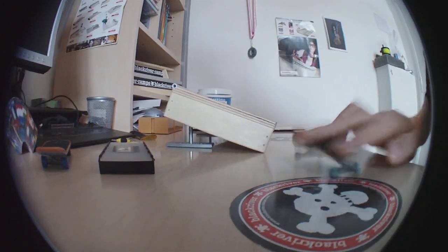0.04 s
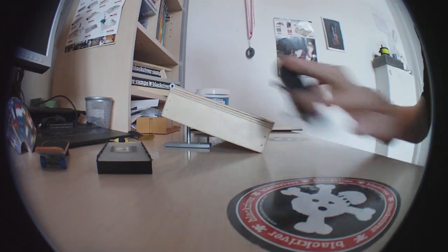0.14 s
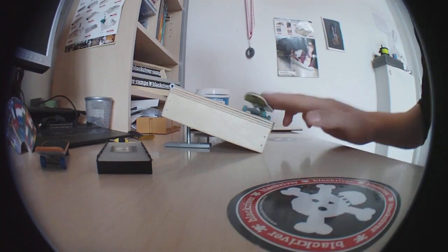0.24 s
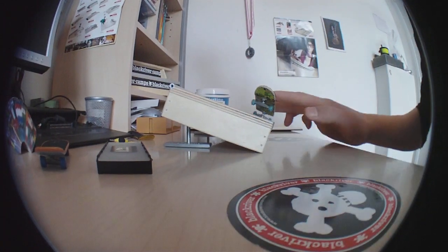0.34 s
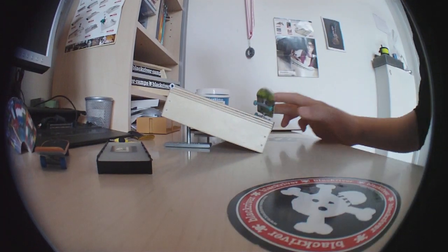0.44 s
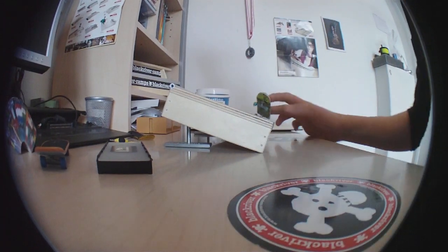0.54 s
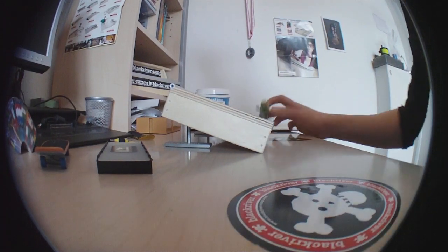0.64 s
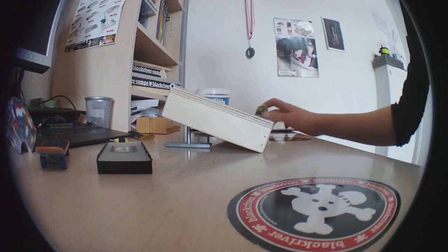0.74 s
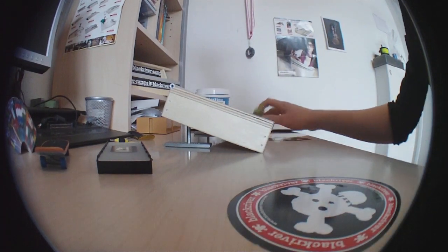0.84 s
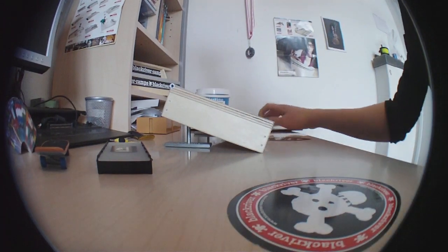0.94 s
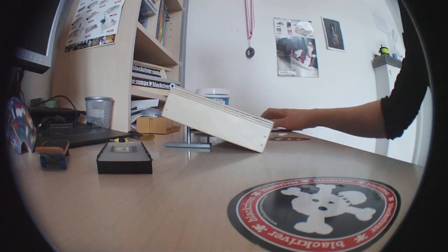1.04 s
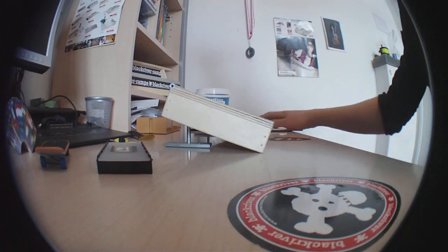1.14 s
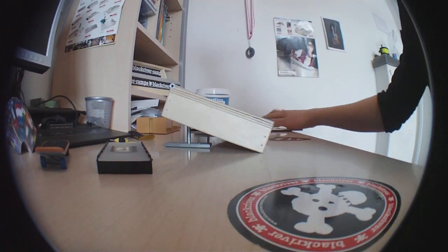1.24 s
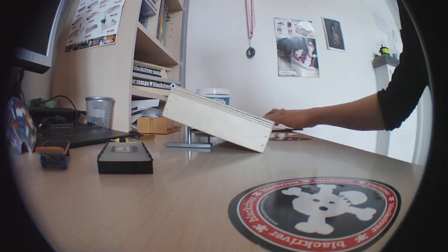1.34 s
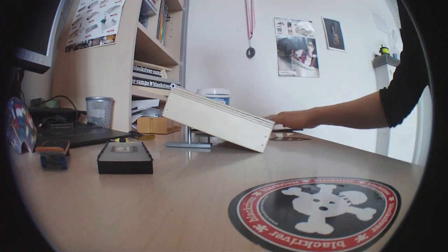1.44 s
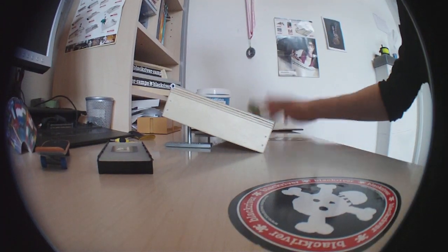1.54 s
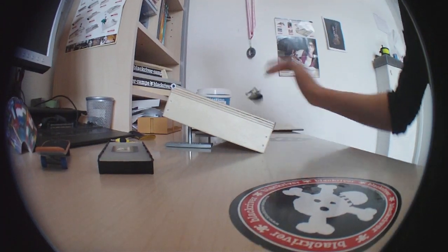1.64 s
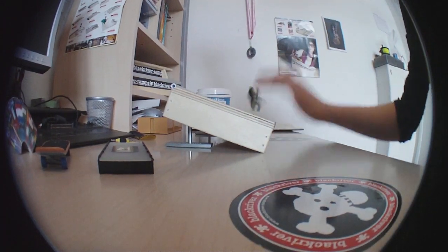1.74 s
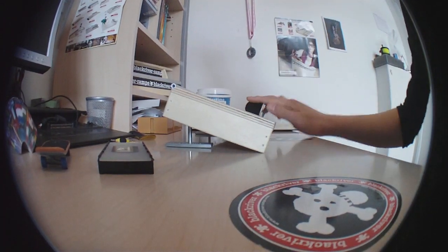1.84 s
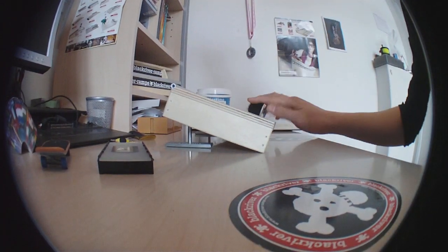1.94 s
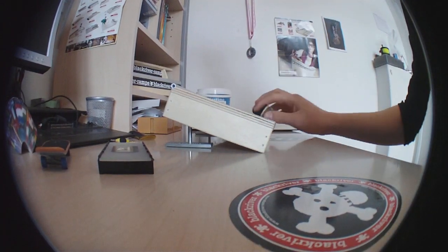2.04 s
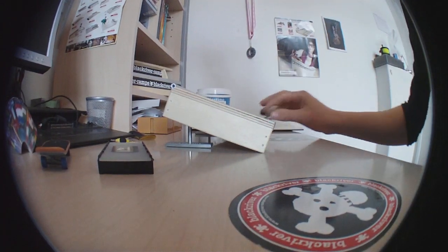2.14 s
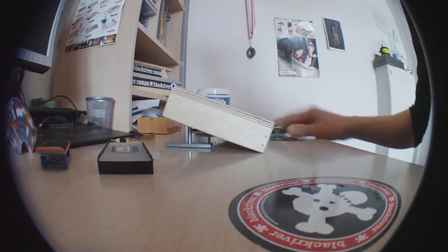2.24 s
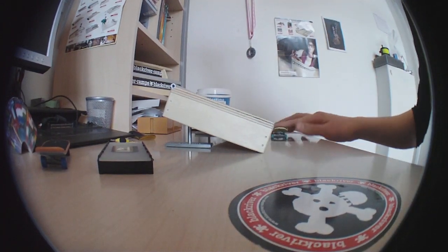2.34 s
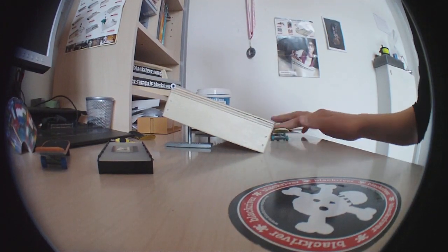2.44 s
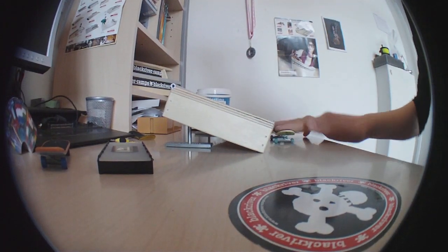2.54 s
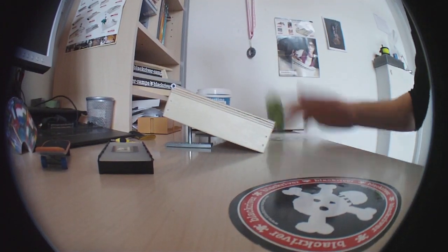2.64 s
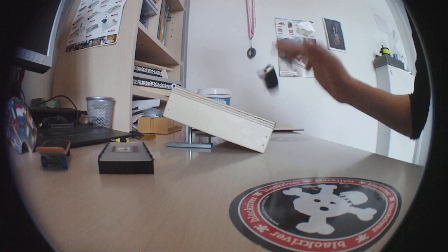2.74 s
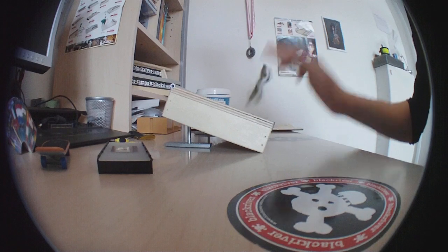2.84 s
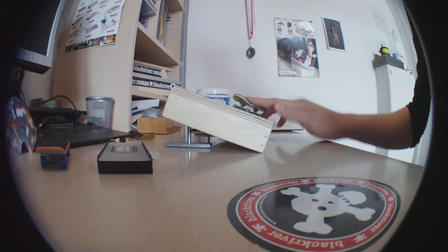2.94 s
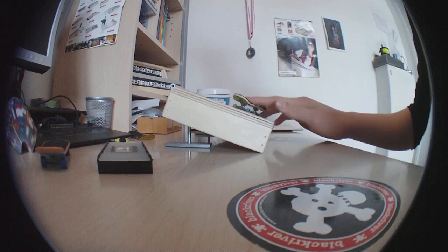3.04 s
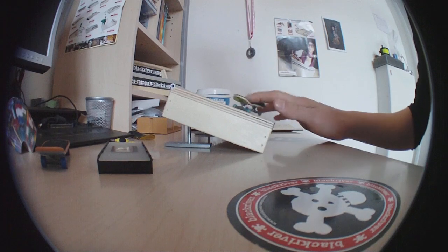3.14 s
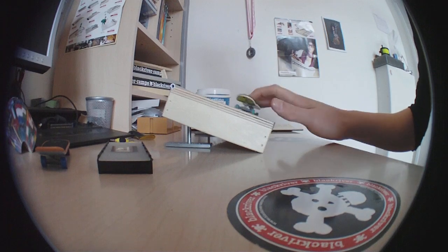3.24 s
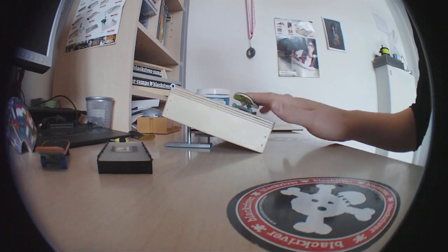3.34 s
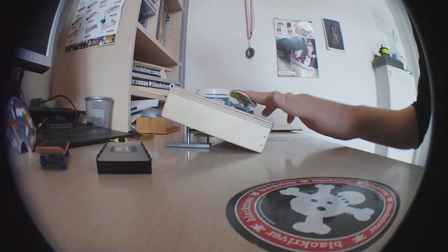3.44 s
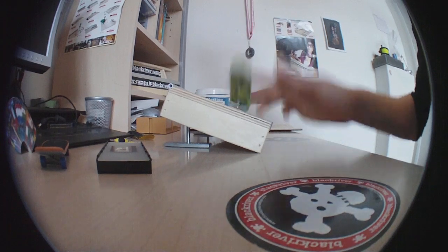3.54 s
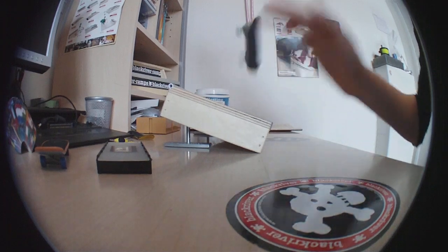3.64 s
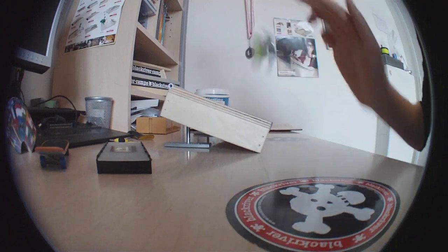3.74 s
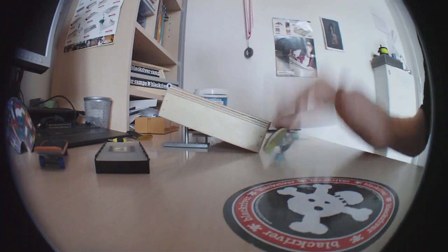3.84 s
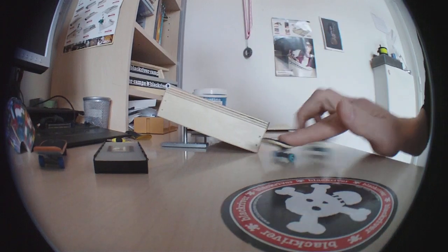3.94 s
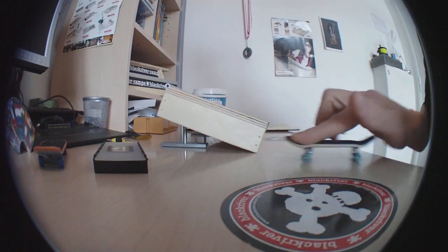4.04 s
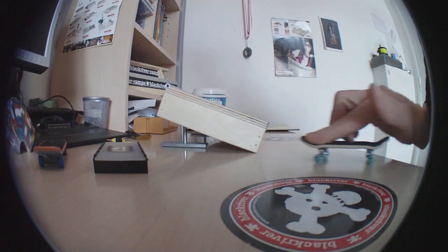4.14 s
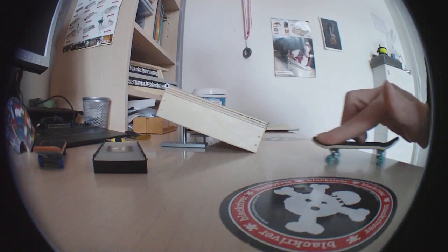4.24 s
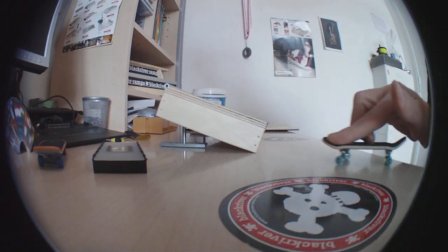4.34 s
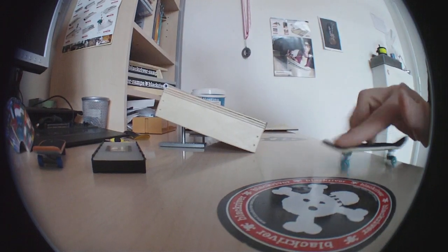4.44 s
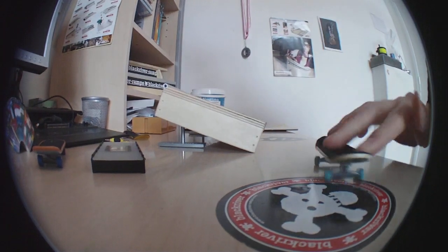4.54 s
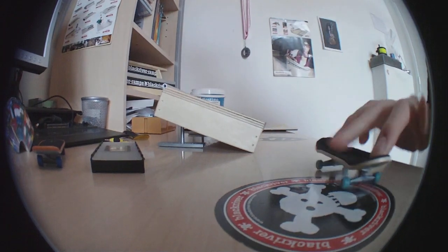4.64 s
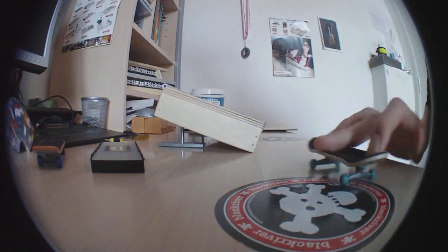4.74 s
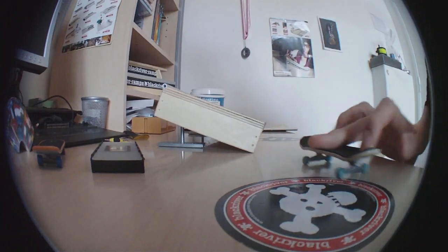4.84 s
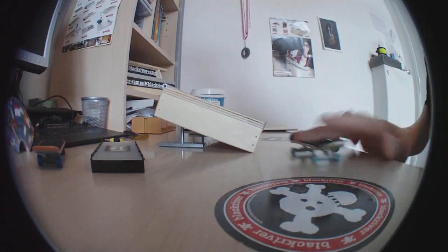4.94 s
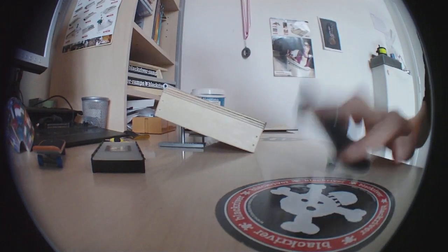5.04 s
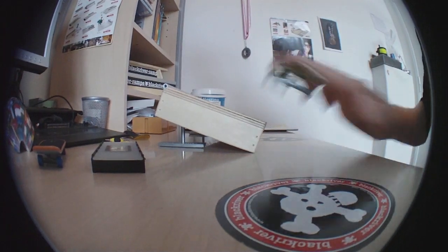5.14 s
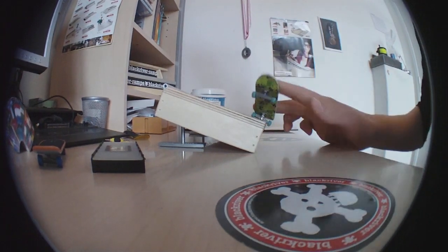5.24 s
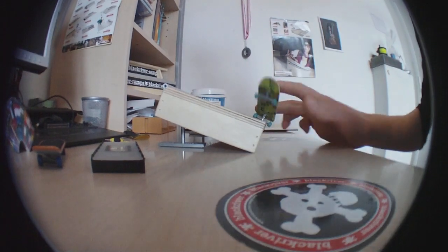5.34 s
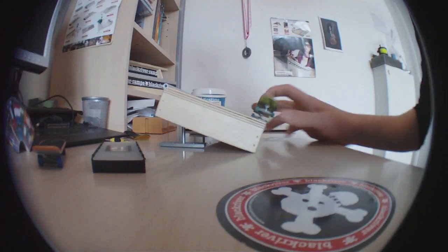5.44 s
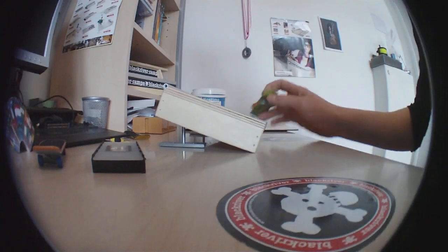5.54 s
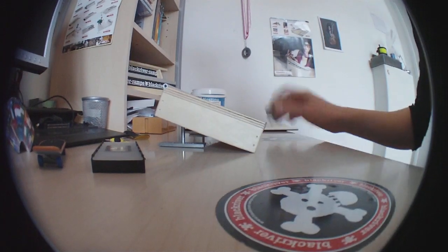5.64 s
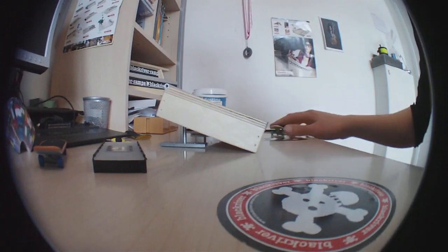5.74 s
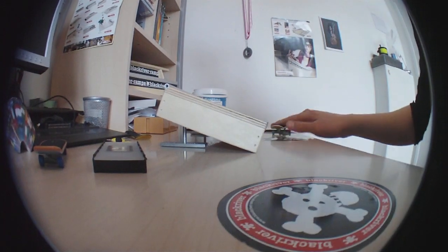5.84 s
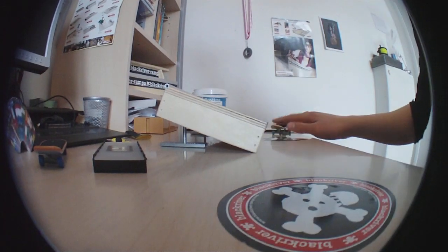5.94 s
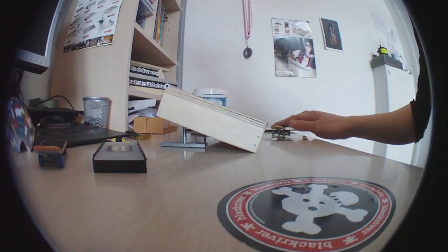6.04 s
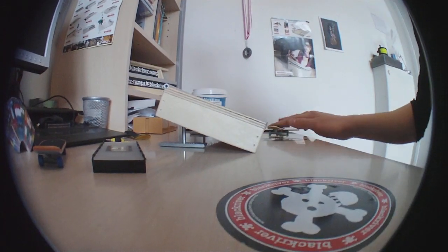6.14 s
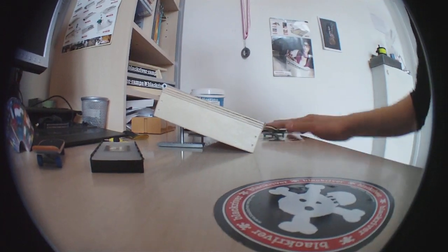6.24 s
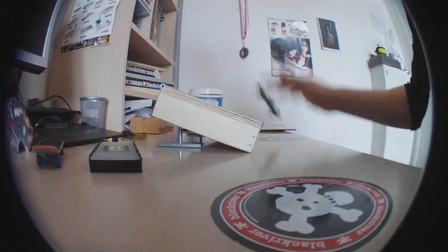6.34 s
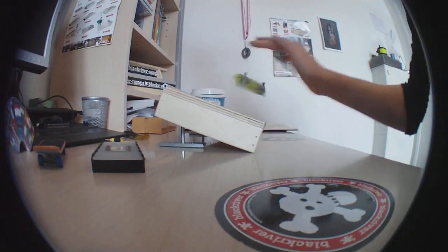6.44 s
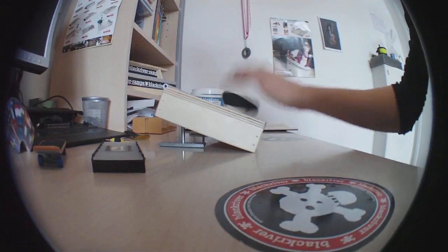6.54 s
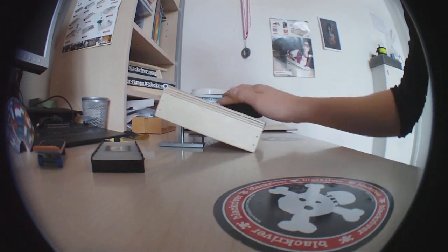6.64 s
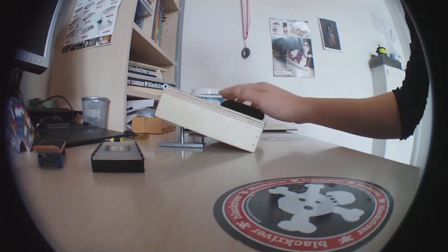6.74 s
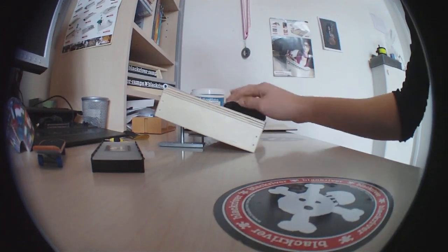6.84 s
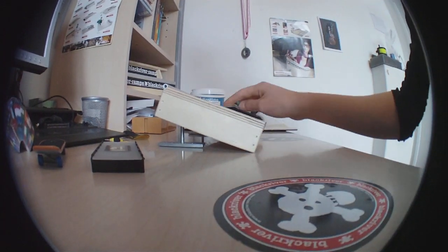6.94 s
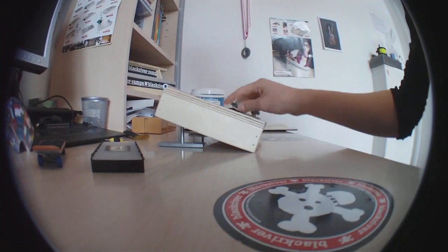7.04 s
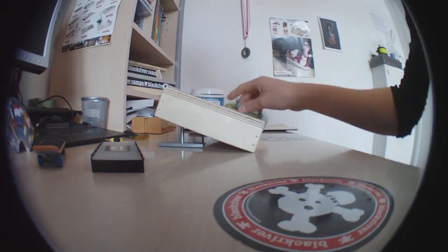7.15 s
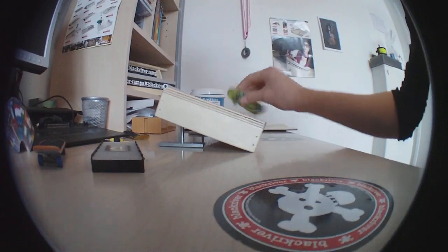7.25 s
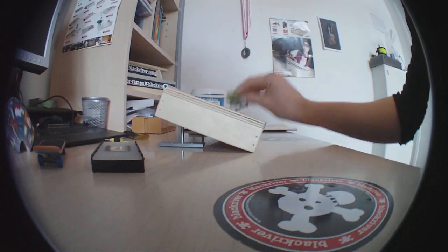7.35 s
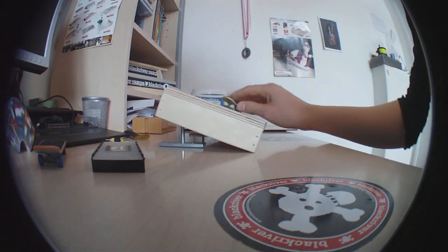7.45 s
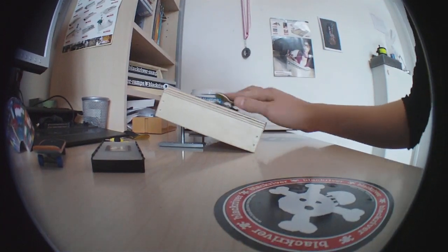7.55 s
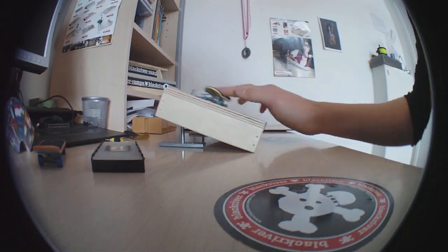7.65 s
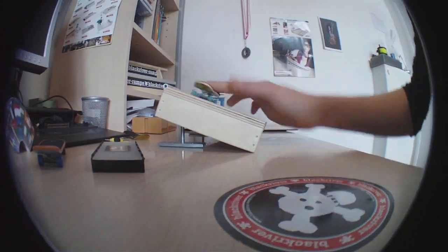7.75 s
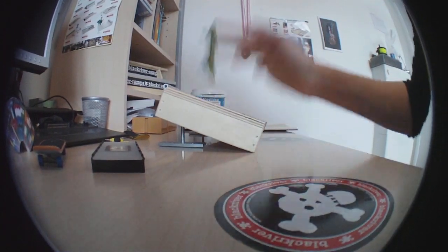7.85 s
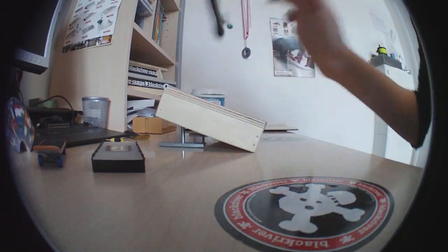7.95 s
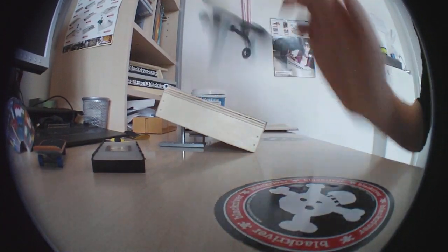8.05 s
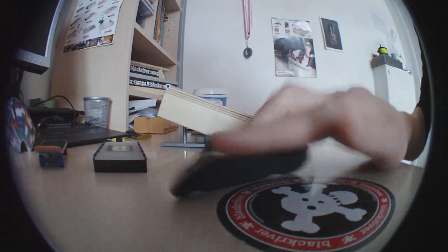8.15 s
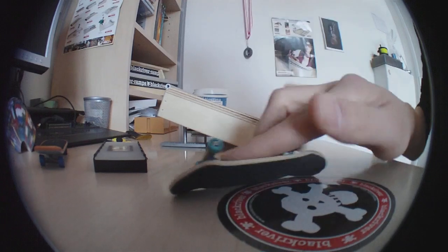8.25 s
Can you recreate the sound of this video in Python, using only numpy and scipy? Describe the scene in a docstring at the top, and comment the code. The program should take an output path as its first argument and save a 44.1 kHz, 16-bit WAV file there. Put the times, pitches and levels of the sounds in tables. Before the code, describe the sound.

Close stereo sound in a small quiet room with a faint high whine. A tiny skateboard rolls in a short rough burst, its tail snaps at 0.2 s and it clacks on the hollow ramp at 0.3, then grinds along it, dropping to the desk near 0.8. Faint taps and finger rubs follow until a light snap at 1.6 and strong woody clacks with a metallic ping at 1.8-1.9. Desk clacks at 2.3, a roll, a loud pop at 2.7, a ramp rattle around 3.0, a slide and a loud pop at 3.65. A desk clatter at 3.9-4.0 leads into uneven rolling, with a pop at 5.15, ramp hit at 5.3, scraping slide and desk click at 5.8. After soft rolls, a pop at 6.4 and ramp clatter at 6.65. Near quiet, then ramp taps at 7.45, a slide, a pop at 7.9 and a hard desk double clack at 8.2.

```python
"""Fingerboard on a desk

A tiny skateboard is ridden by hand in a small room: its tail pops, and its wheels and deck clack onto a desk
and a hollow wooden ramp. A blow is filtered noise for the click, knock and room, plus fading tones for wood.
Rolling and sliding are noise that swells with each push. Fingers rub softly, and under it all lie
quiet room noise and a camera's thin whine."""
import sys
import numpy as np
from scipy import signal
from scipy.fft import rfft, irfft, next_fast_len
from scipy.io import wavfile
from scipy.ndimage import uniform_filter1d, map_coordinates

SR = 44100
rng = np.random.default_rng(int(sys.argv[2]) if len(sys.argv) > 2 else 0)


def waveform_to_disk(signal):
    """Save audio, clipped to [-1, 1], as 16-bit WAV at the path in sys.argv[1]."""
    frames = np.transpose(np.atleast_2d(signal))
    scaled = np.clip(frames, -1, 1) * 32767
    samples = np.round(scaled).astype(np.int16)
    wavfile.write(sys.argv[1], SR, samples)


N = 365588  # length in samples

# All table levels are relative: each sound also gets its own trim in the functions below.
# Ringing tones of the desk top, of its panels and of the whole desk: [f/Hz, level/dB]
DESK_MODES = [(502,-10),(556,-7),(739,-6.5),(905,-15.5),(1077,-4.5),(1630,-7.5)]
PANEL_MODES = [(157,1.5),(205,-12.5),(245,-10.5),(288,1),(330,-2)]
THUD_MODES = [(30,1.5),(44,-2.5),(78,2),(100,2.5)]
# Ringing tones of the ramp's wood and of its hard edge: [f/Hz, level/dB]
RAMP_MODES = [(466, -8), (502, -3.5), (550, 0.5), (591, 0), (670, 2), (904, -1), (990, -6.5), (1080, 0),
              (1400, -5)]
EDGE_MODES = [(2590, -4), (2630, -1), (3286, -8), (3440, 0), (3661, -2.5)]

# Noise colours of a blow: board click, desk knock, ramp knock, desk panels: [f/Hz, level/dB]
CLICK_COLOUR = [(900,-37.5),(2200,-16.5),(3200,-12),(4300,-3.5),(5700,-8),(6500,-3),(7100,1.5),(7800,-4),(8700,-3.5),(10000,-11),(12000,-17),(15000,-21.5)]
DESK_KNOCK_COLOUR = [(200,-50),(400,-13.5),(540,-5.5),(800,-3.5),(1080,1),(1350,-2),(1650,-1),(2100,-8),(3000,-7.5),(6000,-19)]
RAMP_KNOCK_COLOUR = [(200,-36.5),(400,-14),(540,-1.5),(750,-4),(1000,3),(1400,-4.5),(2000,-9),(3400,-12),(7000,-29)]
PANEL_COLOUR = [(50,-21.5),(150,-3),(210,-10),(310,-2),(420,-10),(800,-34)]
# Noise colours of riding: rumble of desk and ramp, hiss of the scraping board: [f/Hz, level/dB]
DESK_RUMBLE_COLOUR = [(60,-21.5),(210,-28.5),(330,-9),(420,-16),(560,-10.5),(820,-7),(1070,2),(1270,-6.5),(1620,-11),(2100,-25),(3400,-28),(7000,-63.5)]
RAMP_RUMBLE_COLOUR = [(60,-17.5),(200,-27.5),(310,-10),(390,-15),(540,4),(660,0.5),(770,-5.5),(940,-1),(1400,-6.5),(1900,-18),(7000,-47)]
HISS_COLOUR = [(900,-27.5),(1450,2),(2200,-6),(3200,-4),(4200,-3.5),(5500,-12),(6500,-5.5),(7100,-3),(7800,-10.5),(8700,-8),(10000,-16.5),(15000,-34)]
# Noise colours of the wheels: their own resonance, and the whirr that joins in at speed: [f/Hz, level/dB]
WHEEL_RING_COLOUR = [(700, -41), (960, -6), (1080, -0.5), (1200, -11.5), (1500, -48.5)]
WHEEL_WHIRR_COLOUR = [(900, -30), (1300, -5), (1620, 0), (2000, -16.5), (2400, -5.5), (3200, -32)]
# Noise colours of fingers on grip tape and of the quiet room: [f/Hz, level/dB]
GRIP_COLOUR = [(2500, -36), (3400, -19), (4000, -7.5), (5300, -22), (6400, -4.5), (7050, -4.5), (7700, -14),
               (8700, -11.5), (10500, -28), (15000, -31)]
ROOM_COLOUR = [(25, -6), (170, -2), (400, -10.5), (1100, -18.5), (1800, -22), (5500, -23.5), (6900, -17),
               (9000, -23.5), (11000, -31), (15000, -39.5)]

# Stereo width, as a gain on the side signal: [f/Hz, level/dB]
WIDTH = [(60,-11.5),(500,-17.5),(1200,-15),(2400,-10.5),(4400,-2),(7500,4),(15000,-8.5)]
# Stereo balance, left minus right: [f/Hz, level/dB]
TILT = [(100,-0.5),(1200,1.3),(2400,-1),(4400,-2.5),(7000,-11),(9000,7.5),(15000,-3)]
# The camera's upper band limit: [f/Hz, level/dB]
BAND_LIMIT = [(15100,0),(15500,-14),(16400,-45),(16600,-120)]

# The tail snaps down to pop the board up, or just taps: [t/s, strength level/dB]
TAIL_POPS = [(0.1847, -12), (1.068, -26), (1.642, -26), (2.7369, -6.5), (3.6492, -6.5), (5.1467, -9.5),
             (6.4037, -6), (7.0575, -34.5), (7.89, -7.5)]
# Wheels and deck come down on the desk, then on the ramp:
# [t/s, force level/dB, hardness (click over knock) level/dB, weight of the hand behind it level/dB]
DESK_LANDINGS = [(0.7772, -25, 14.5, -35), (2.3206, -22, 16, -28.5), (2.3465, -15, 8.5, -38),
                 (3.9203, -14.5, 11, -17), (3.9504, -10.5, 5.5, -24.5), (3.9848, -9.5, 6.5, -26),
                 (4.5555, -26.5, -2.5, -58), (4.6278, -30, 7.5, -43), (5.0761, -26.5, 9, -27.5),
                 (5.779, -17, 15, -30.5), (8.1998, -10, 3, -18), (8.2086, -8.5, 9.5, -17.5)]
RAMP_LANDINGS = [(0.3056, -10.5, 9, -17), (0.3134, -23, 21, -41), (1.8036, -12.5, 2.5, -24),
                 (1.8718, -9.5, -3, -19), (1.8827, -8.5, 4.5, -25.5), (2.9646, -15, 2.5, -21.5),
                 (2.9816, -18.5, 6.5, -25), (3.008, -17.5, 10, -29), (3.0303, -19, 7, -25),
                 (3.2644, -23, 8, -30.5), (5.2922, -13.5, 14, -19), (6.626, -21.5, 17, -27.5),
                 (6.6598, -16, 11.5, -22.5), (6.6772, -12.5, -5, -23.5), (7.2483, -41, 8, -47.5),
                 (7.2877, -43.5, 15, -65), (7.4542, -28.5, 16, -40), (7.4595, -20.5, -1, -32.5),
                 (7.4904, -18, 9, -33.5)]
# A metal truck catches the ramp's edge as the board lands: [t/s, level/dB]
EDGE_STRIKES = [(0.3056, -27.5), (1.8036, -28.5), (1.8827, -13.5), (5.2922, -26), (6.626, -28.5),
                (6.6772, -18.5), (7.4595, -31)]
# Pushes over the desk, then slides and rolls along the ramp:
# [fastest moment t/s, rumble level/dB, speed-up t/s, slow-down t/s, scrape (hiss over rumble) level/dB]
DESK_PUSHES = [(0.05, -22, 0.21, 0.17, -2), (0.135, -26, 0.059, 0.09, -1), (0.935, -41.5, 0.19, 0.086, -12),
               (1.11, -54, 0.3, 0.21, -14), (1.364, -48.5, 0.09, 0.085, -18), (1.55, -51, 0.075, 0.14, -15),
               (2.09, -34, 0.17, 0.22, -9.5), (2.605, -29, 0.22, 0.16, -4.5),
               (2.7, -29.5, 0.061, 0.074, -1), (4.19, -35, 0.41, 0.22, -8.5), (4.29, -37, 0.35, 0.66, -35),
               (4.575, -25.5, 0.085, 0.2, 0.5), (4.88, -36, 0.16, 0.1, -11), (5.025, -26, 0.18, 0.22, -7),
               (5.945, -42, 0.16, 0.12, -6), (6.065, -36, 0.047, .12, -10.5), (6.185, -40, 0.072, .08, -27),
               (6.285, -27.5, 0.081, 0.12, -7), (6.365, -24, 0.051, 0.076, -7)]
RAMP_PUSHES = [(0.6, -23.5, 0.14, .28, -6.5), (0.71, -35.5, 0.54, 0.17, 7), (3.395, -42, 0.24, 0.069, -27),
               (3.565, -30, 0.2, 0.3, -19.5), (5.49, -31.5, 0.19, 0.45, -14.5),
               (5.595, -29, 0.26, 0.14, -3.5), (7.62, -32, 0.068, 0.3, -34.5),
               (7.735, -28.5, 0.19, .34, -9.5)]
# Fingers press and rub the board's grip tape: [t/s, press level/dB, rub level/dB]
FINGER_TOUCHES = [(0.965, -68, -48), (1.06, -59, -47), (1.135, -50, -56), (1.225, -67, -52),
                  (1.363, -44, -54), (1.54, -50, -57), (1.655, -38.5, -43), (6.94, -60.5, -53.5),
                  (7.07, -55, -49.5), (7.21, -48.5, -63)]

RING_T60_S = 0.23  # time for a ringing tone to fall by 60 dB
DIRECT_DB = 9  # the first crack of a blow, over the scatter that follows it
POP_KNOCK_DB, POP_BODY_DB, POP_THUD_DB = -20, -22.5, -32  # relative to a pop's click, before trims
THUD_GROWTH = 1.196  # dB of thud per dB of weight: heavy landings move the whole desk most
PUSH_DROP_DB, PUSH_SHAPE = 41, 1.627  # fall over one speed-up or slow-down time; roundness of the peak
FINGER_RISE_S, FINGER_FALL_S = 0.043, 0.094
RING_GROWTH, WHIRR_GROWTH = 0.98, 1.577  # dB per dB of rumble
LEFT_LAG_S = 2.3e-5  # the left side hears everything this much later


def amp(db):
    """Turn decibels into gain."""
    return 10 ** (np.asarray(db) / 20)


def unit(x):
    """Scale to an average (rms) strength of 1."""
    return x / np.sqrt(np.mean(x ** 2) + 1e-20)


def along(points, hz):
    """Read a curve of (Hz, value) points on a log frequency axis."""
    f, value = np.transpose(points)
    return np.interp(np.log(hz + 1), np.log(f + 1), value)


def wobble(rate):
    """Draw a smooth random curve through `rate` random points a second."""
    knots = rng.standard_normal(8192)
    return map_coordinates(knots, [np.arange(N) * rate / SR], mode="wrap")


def filtered(x, gain):
    """Multiply each frequency of x by a gain."""
    size = next_fast_len(N + SR // 4)
    hz = np.fft.rfftfreq(size, 1 / SR)
    return irfft(rfft(x, size) * gain(hz), size)[..., :N]


def coloured(x, spectrum, size=4096):
    """Give noise a colour without smearing it backwards in time; white noise keeps its power."""
    hz = np.fft.rfftfreq(size, 1 / SR)
    cepstrum = irfft(np.log(amp(along(spectrum, hz))))
    # folding the cepstrum puts the filter's whole response after its start
    cepstrum[1:size // 2] *= 2
    cepstrum[size // 2 + 1:] = 0
    response = irfft(np.exp(rfft(cepstrum)))
    response /= np.linalg.norm(response)
    return signal.fftconvolve(x, response[None], axes=1)[:, :N]


def shifting(x, depth_db, size=1024):
    """Drift the balance of frequencies, as reflections do when the board and hand move."""
    spectrum = signal.stft(x, nperseg=size)[2]
    field = rng.standard_normal(spectrum.shape[1:])
    field = uniform_filter1d(field, size=3, axis=0)  # smooth over frequency
    field = uniform_filter1d(field, size=7, axis=1)  # smooth over time
    gain = unit(amp(depth_db * unit(field)))
    return signal.istft(spectrum * gain, nperseg=size)[1][:, :N]


def add(track, s, sound):
    """Mix a sound into a track at time s."""
    part = track[..., max(round(s * SR), 0):][..., :sound.shape[-1]]
    part += sound[..., :part.shape[-1]]


def swell(s, db, rise_s, fall_s):
    """Power of one movement: it gathers speed up to time s and then runs out."""
    t = np.arange(N) / SR - s
    first, last = np.searchsorted(t, [-4 * rise_s, 4 * fall_s])
    t = t[first:last]
    away = np.abs(t / np.where(t < 0, rise_s, fall_s))
    power = amp(db - PUSH_DROP_DB * away ** PUSH_SHAPE) ** 2
    return np.pad(power, (first, N - last))


def clatter(times, levels, spectrum, near_t60, room_db, room_t60, flutter_db, patchy_db):
    """Each blow cracks, scatters off things on the desk within milliseconds, then dies away in the room."""
    t = np.arange(SR // 2) / SR
    rise = 1 - np.exp(-t / 0.0015)
    near = amp(-60 * t / near_t60) ** 2
    room = amp(room_db - 60 * t / room_t60) ** 2
    power, direct = np.zeros(N), np.zeros((2, N))
    for s, db in zip(times, levels):
        add(power, s, amp(db) ** 2 * rise * (near + room))
        direct[0, round(s * SR)] += amp(db + DIRECT_DB)
    # single strong reflections stand out of the dense ones
    patchy = shifting(rng.standard_normal((2, N)), patchy_db)
    echoes = unit(patchy * amp(flutter_db * wobble(500)))
    return coloured(direct + np.sqrt(power) * echoes, spectrum)


def ring(times, levels, modes, scatter_db, attack):
    """Each blow rings the tones at new strengths, as it lands on a new spot."""
    t = np.arange(SR // 2) / SR
    hz, mode_db = np.transpose(modes)[:, :, None]
    fade = amp(mode_db - 60 * t / RING_T60_S) * (1 - np.exp(-t / attack))
    tones = fade * np.exp(2j * np.pi * hz * t) / np.linalg.norm(amp(mode_db))
    out = np.zeros((2, N))
    for s, db in zip(times, levels):
        strength = amp(db + rng.normal(0, scatter_db, (2, len(modes))))
        phase = np.exp(2j * np.pi * rng.random(strength.shape))
        add(out, s, ((strength * phase) @ tones).real)
    return out


def background(hiss_db):
    """Quiet room noise and the camera's thin electronic whine, a tone with slightly wandering phase."""
    noise = coloured(rng.standard_normal((2, N)), ROOM_COLOUR)
    phase = 2 * np.pi * 7865 * np.arange(N) / SR + 0.3 * wobble(8)
    whine = amp(-66) * np.sin(phase)
    return amp(hiss_db) * noise + whine * [[1], [0]]  # the whine is in the middle only


def wheels(pushes, rumble_spectrum, rumble_db, hiss_db, ring_db, whirr_db,
           bump_db, bump_rate, grit_db, patchy_db):
    """Surface grain makes wood rumble, the board hiss and wheels ring; a higher whirr grows with speed."""
    rolling, scraping = np.zeros((2, N))
    for s, db, rise_s, fall_s, scrape_db in pushes:
        power = swell(s, db, rise_s, fall_s)
        rolling += power
        scraping += power * amp(scrape_db) ** 2
    level = np.sqrt(rolling)
    bumps = amp(bump_db * wobble(bump_rate))  # slightly uneven wheels load and unload

    def grit():
        """Rough noise for the countless tiny knocks of the grain."""
        patchy = shifting(rng.standard_normal((2, N)), patchy_db)
        return unit(patchy * bumps * amp(grit_db * wobble(600)))

    tread, scrape = grit(), grit()
    rumble = coloured(tread * level, rumble_spectrum)
    hiss = coloured(scrape * np.sqrt(scraping), HISS_COLOUR)
    # [::-1] swaps the middle and side noise, so the layers do not share one pattern
    note = coloured(scrape[::-1] * level ** RING_GROWTH, WHEEL_RING_COLOUR)
    whirr = coloured(tread[::-1] * level ** WHIRR_GROWTH, WHEEL_WHIRR_COLOUR)
    return amp(rumble_db) * rumble + amp(hiss_db) * hiss + amp(ring_db) * note + amp(whirr_db) * whirr


def pops():
    """Time and the click, knock, body and thud levels of each tail strike, which is nearly all click."""
    s, db = np.transpose(TAIL_POPS)
    return np.array([s, db, db + POP_KNOCK_DB, db + POP_BODY_DB, db + POP_THUD_DB])


def desk_hits(blows):
    """Tail, wheels and deck strike the desk: a bright click over a dull knock and ringing wood."""
    s, click_db, knock_db = blows[:3]
    click = clatter(s, click_db - 6.5, CLICK_COLOUR, near_t60=0.021, room_db=-8.5, room_t60=0.26,
                    flutter_db=-0.5, patchy_db=4)
    knock = clatter(s, knock_db + 4.5, DESK_KNOCK_COLOUR, near_t60=0.025, room_db=-14, room_t60=0.33,
                    flutter_db=1.5, patchy_db=5)
    return click + knock + ring(s, knock_db - 12.5, DESK_MODES, scatter_db=5, attack=0.00067)


def ramp_ringing(popped):
    """A pop on or beside the ramp rings its hollow box faintly; a truck on its edge rings high and clear."""
    s, _, knock_db = popped[:3]
    box = ring(s, knock_db - 5, RAMP_MODES, scatter_db=0.5, attack=0.002)
    times, levels = np.transpose(EDGE_STRIKES)
    edge = ring(times, levels, EDGE_MODES, scatter_db=2.5, attack=0.0008)
    return box + edge


def desk_boom(blows):
    """Every blow also shakes the desk's panels; heavy ones move the whole desk."""
    s, _, _, body_db, thud_db = blows
    wash = clatter(s, body_db, PANEL_COLOUR, near_t60=0.092, room_db=-9, room_t60=0.29,
                   flutter_db=-0.5, patchy_db=2.5)
    panels = ring(s, body_db - 4, PANEL_MODES, scatter_db=3.8, attack=0.0015)
    thud = ring(s, thud_db + 3.5, THUD_MODES, scatter_db=2.5, attack=0.00074)
    return wash + panels + thud


def landings(rows, thud_db):
    """Time and click, knock, body and thud levels of each landing; the low sounds follow its weight."""
    s, force, hardness, weight = np.transpose(rows)
    return np.array([s, force + hardness, force, weight, THUD_GROWTH * weight + thud_db])


def ramp_hits(blows):
    """The hollow ramp answers the same kind of click with a longer, woodier knock."""
    s, click_db, knock_db = blows[:3]
    click = clatter(s, click_db - 12, CLICK_COLOUR, near_t60=0.025, room_db=-1.5, room_t60=0.26,
                    flutter_db=0.05, patchy_db=4)
    knock = clatter(s, knock_db + 0.5, RAMP_KNOCK_COLOUR, near_t60=0.094, room_db=-5.5, room_t60=0.35,
                    flutter_db=1.7, patchy_db=5)
    return click + knock + ring(s, knock_db - 5, RAMP_MODES, scatter_db=2.5, attack=0.00047)


def fingers():
    """Soft fingertips stir the desk's low panels and rasp faintly on the grip tape."""
    pressing, rubbing = np.zeros((2, N))
    for s, press_db, rub_db in FINGER_TOUCHES:
        pressing += swell(s, press_db, FINGER_RISE_S, FINGER_FALL_S)
        rubbing += swell(s, rub_db, FINGER_RISE_S, FINGER_FALL_S)
    press_noise = rng.standard_normal((2, N)) * np.sqrt(pressing)
    rub_noise = rng.standard_normal((2, N)) * np.sqrt(rubbing)
    return coloured(press_noise, PANEL_COLOUR) + coloured(rub_noise, GRIP_COLOUR)


def scene():
    """Two close microphones hear the bass alike and the treble differently; the board is to the right."""
    desk = wheels(DESK_PUSHES, DESK_RUMBLE_COLOUR, rumble_db=-2, hiss_db=-3.5, ring_db=-12.5, whirr_db=4.5,
                  bump_db=2, bump_rate=130, grit_db=0.66, patchy_db=6)
    ramp = wheels(RAMP_PUSHES, RAMP_RUMBLE_COLOUR, rumble_db=-3, hiss_db=1.26, ring_db=-21.5, whirr_db=-8,
                  bump_db=1.46, bump_rate=190, grit_db=0.5, patchy_db=3.5)
    on_desk = np.hstack([pops(), landings(DESK_LANDINGS, thud_db=0.5)])
    on_ramp = landings(RAMP_LANDINGS, thud_db=-7)
    boom = desk_boom(np.hstack([on_desk, on_ramp]))
    hits = desk_hits(on_desk) + ramp_hits(on_ramp) + ramp_ringing(pops()) + boom
    # each layer has two rows: middle (same in both ears) and side (opposite in the ears)
    mid, side = hits + desk + ramp + fingers() + background(hiss_db=-57.5)
    side = filtered(side, lambda hz: amp(along(WIDTH, hz)))
    half = np.array([[0.5], [-0.5]])  # share tilt and lag between left and right

    def microphones(hz):
        """Level and delay of each side."""
        return amp(along(TILT, hz) * half) * np.exp(-2j * np.pi * hz * LEFT_LAG_S * half)

    return filtered(np.array([mid + side, mid - side]), microphones)


def record(dry):
    """Round off the hardest clacks at full scale, then cut everything above the camera's band limit."""
    limited = dry / (1 + dry ** 6) ** (1 / 6)
    return filtered(limited, lambda hz: amp(along(BAND_LIMIT, hz)))


dry = scene()
out = record(dry)
waveform_to_disk(out)
```